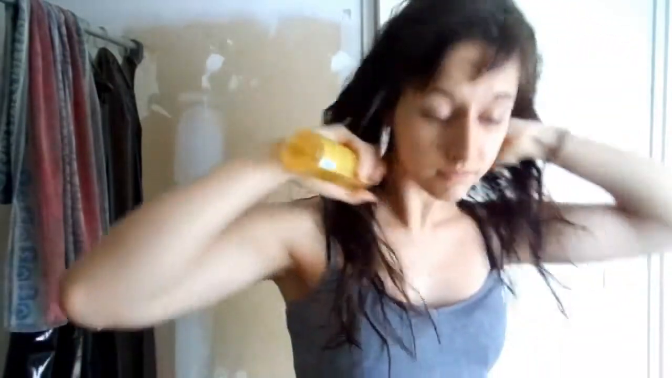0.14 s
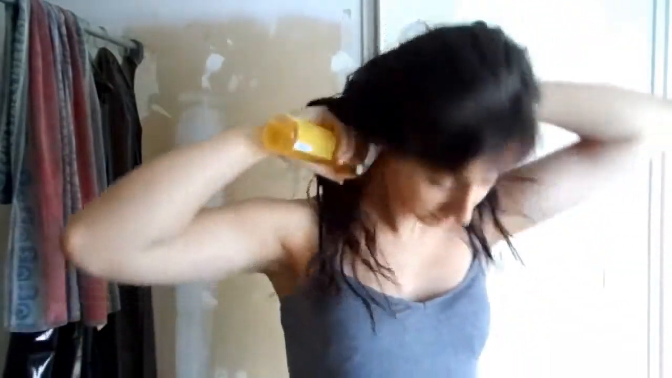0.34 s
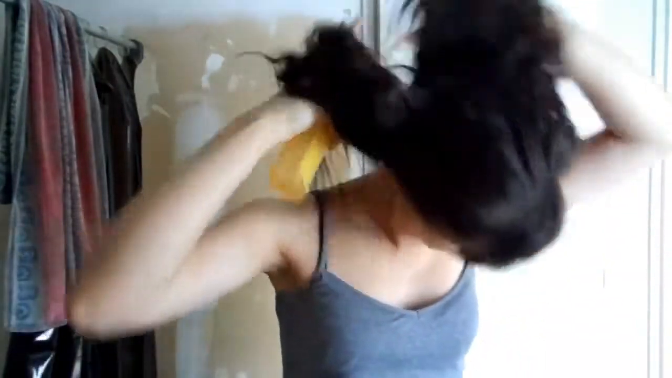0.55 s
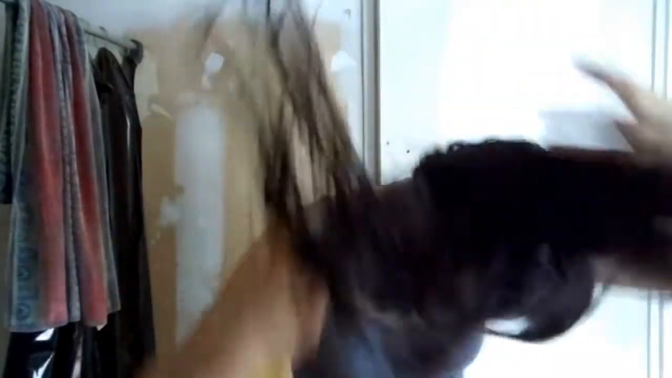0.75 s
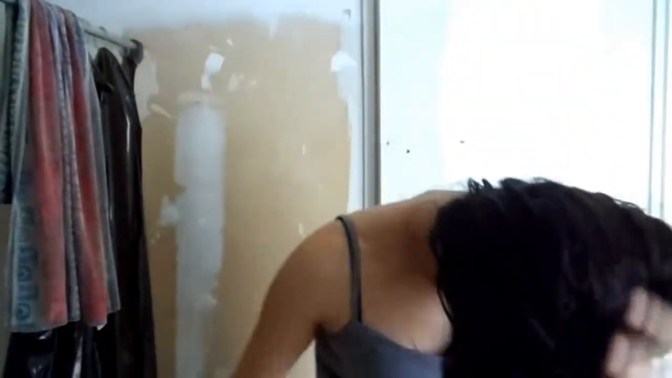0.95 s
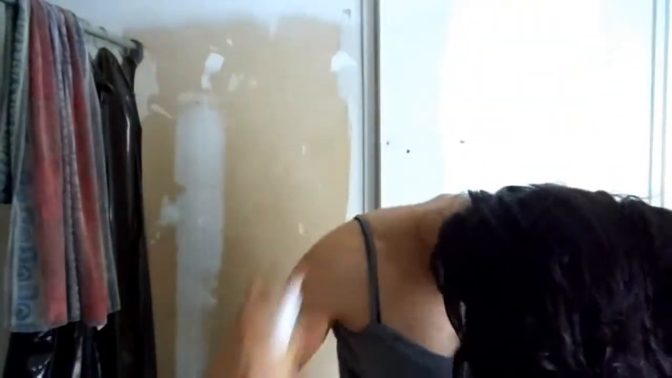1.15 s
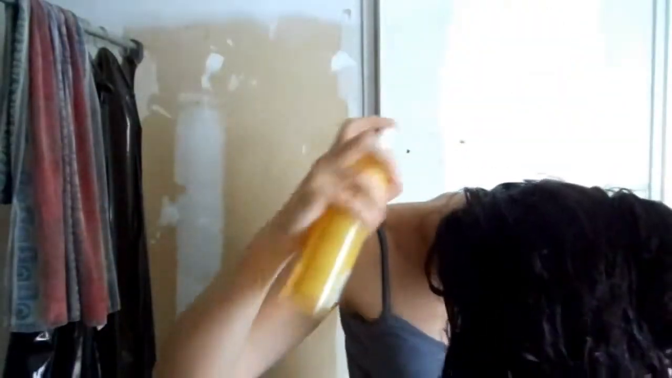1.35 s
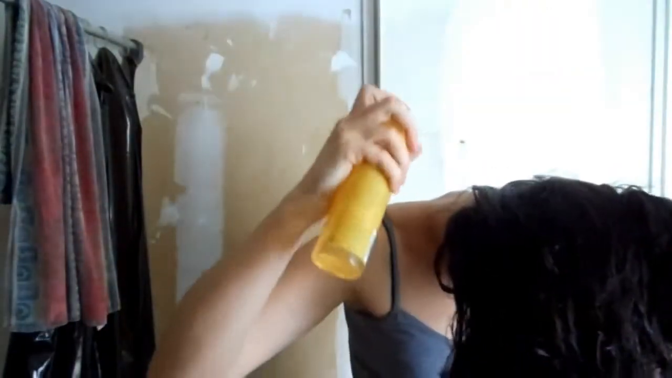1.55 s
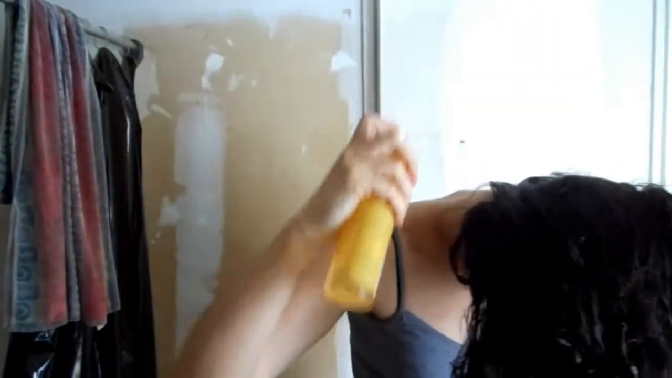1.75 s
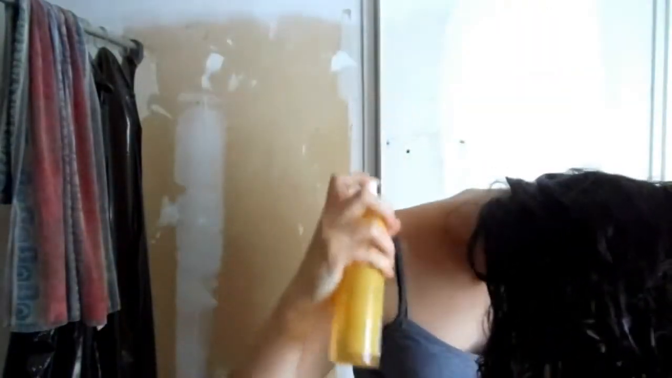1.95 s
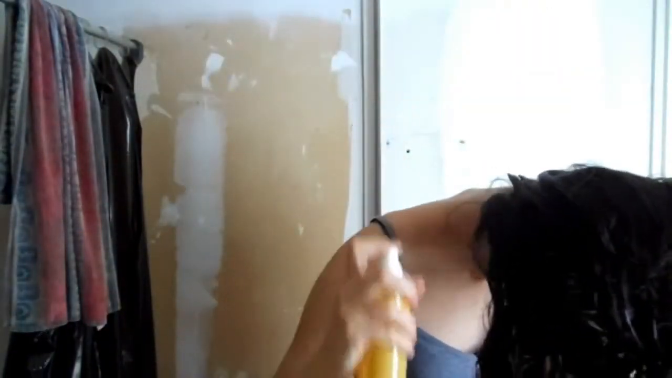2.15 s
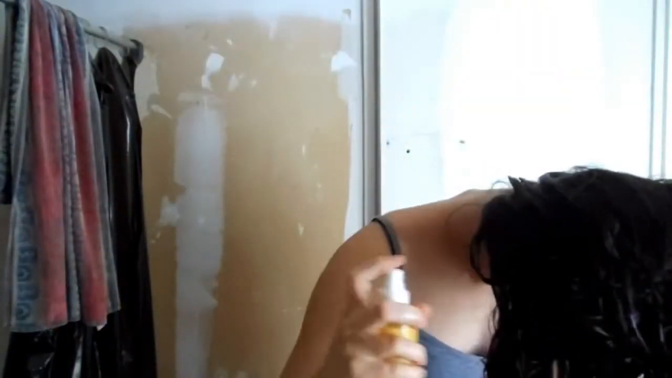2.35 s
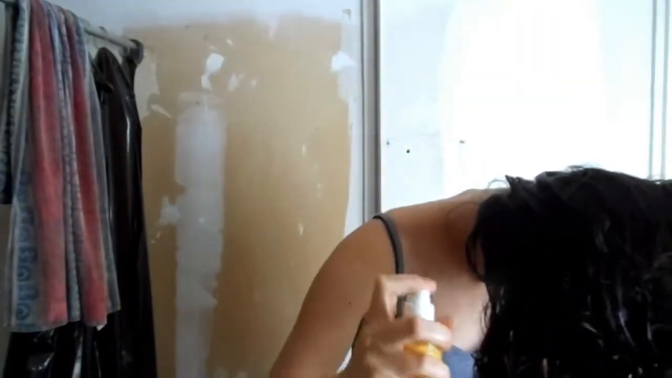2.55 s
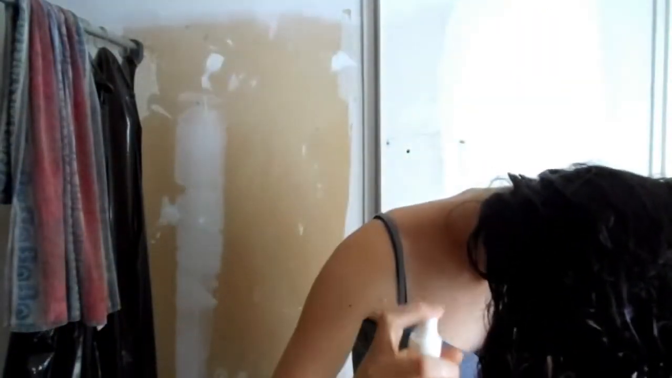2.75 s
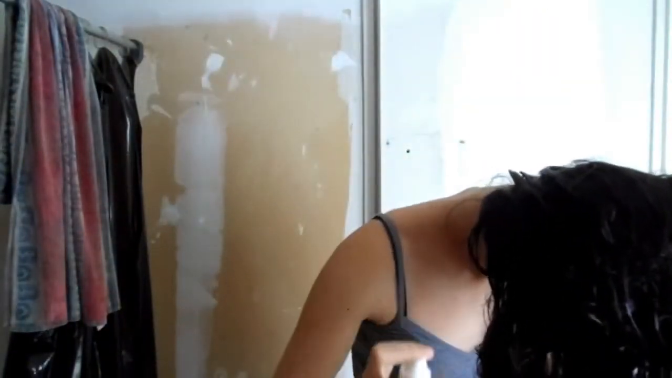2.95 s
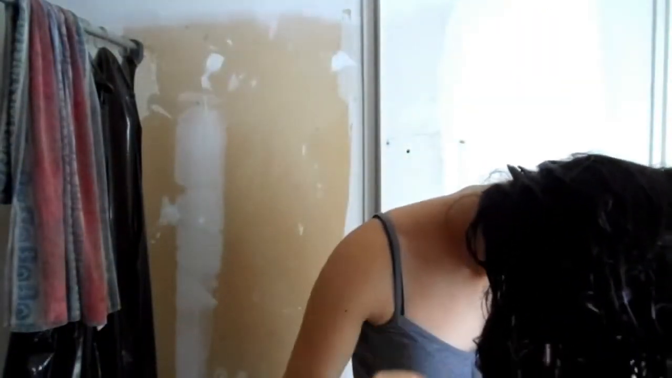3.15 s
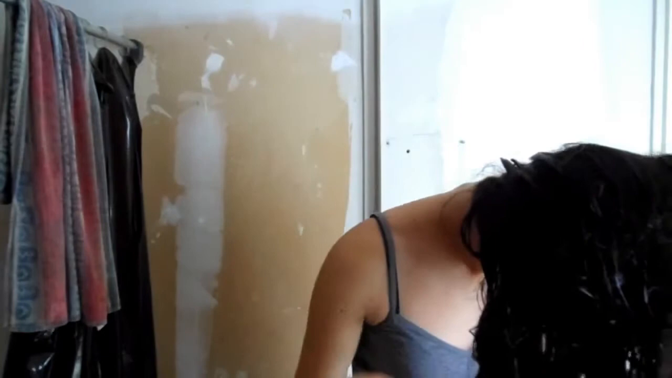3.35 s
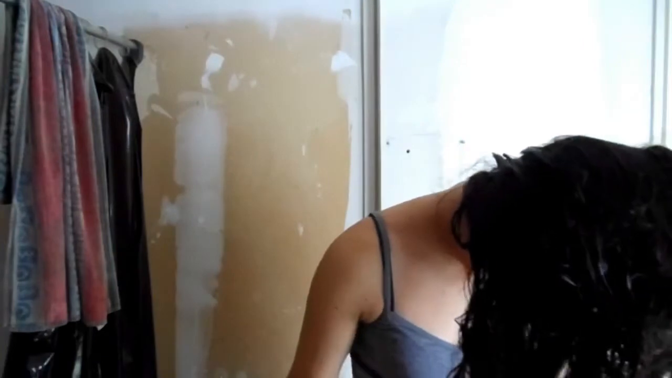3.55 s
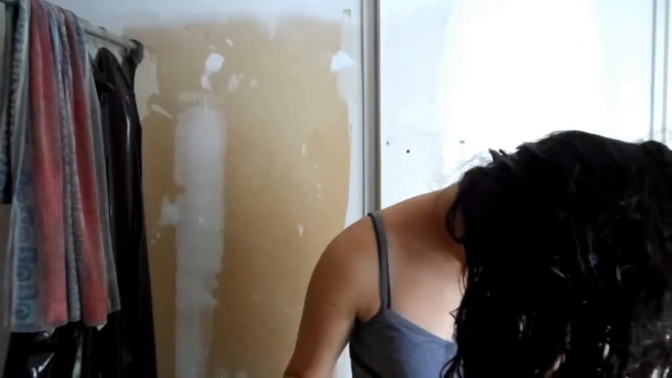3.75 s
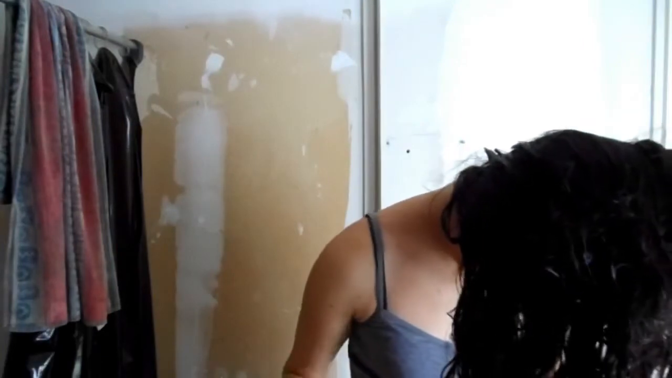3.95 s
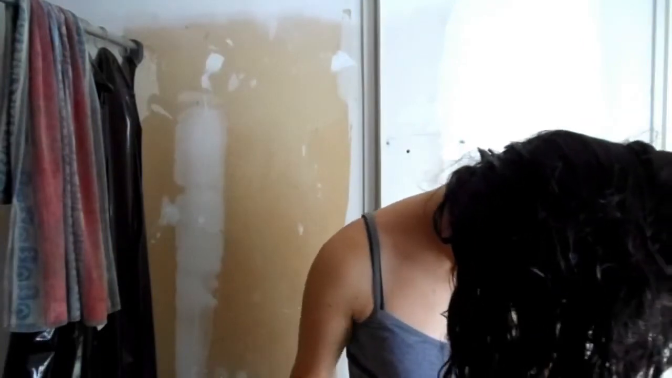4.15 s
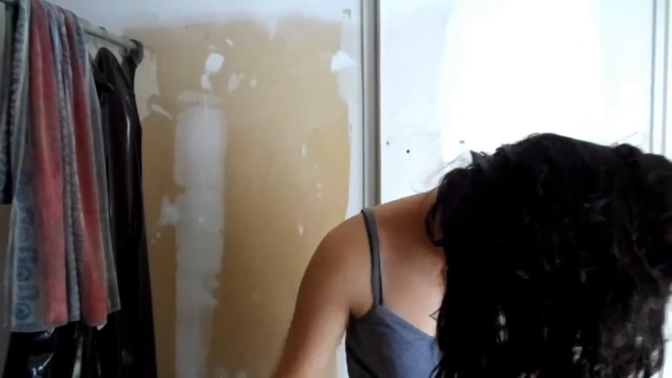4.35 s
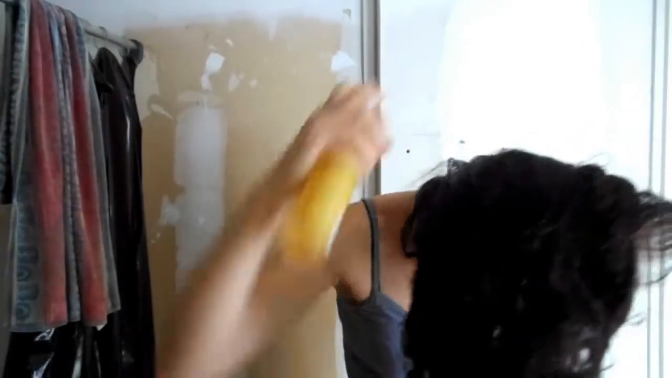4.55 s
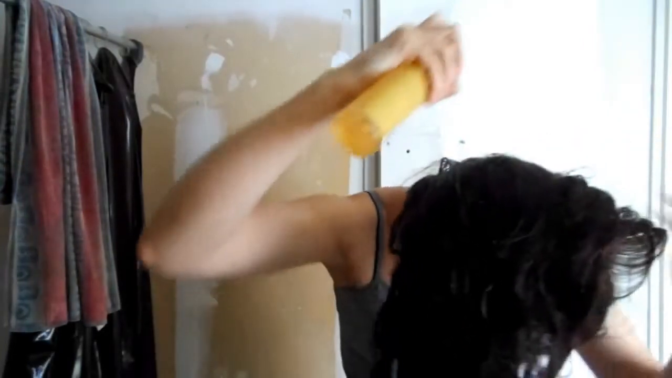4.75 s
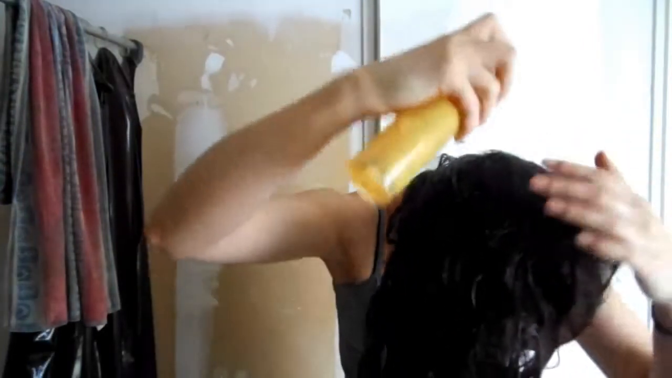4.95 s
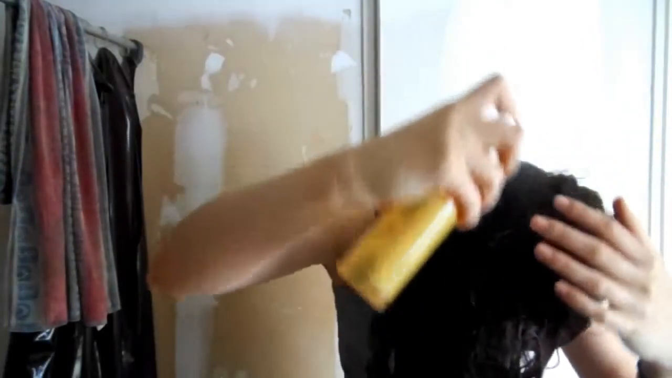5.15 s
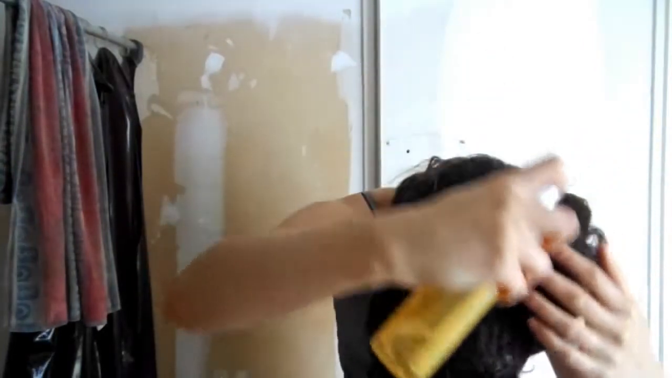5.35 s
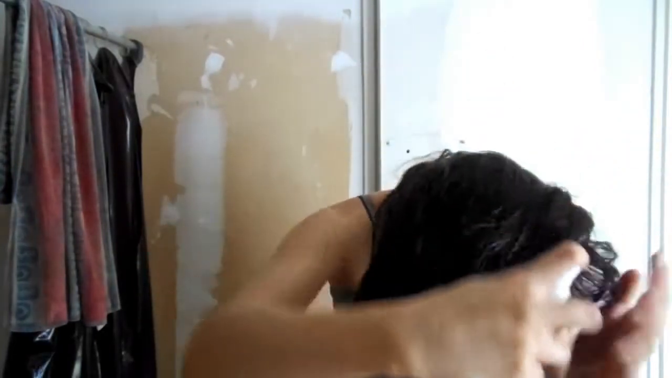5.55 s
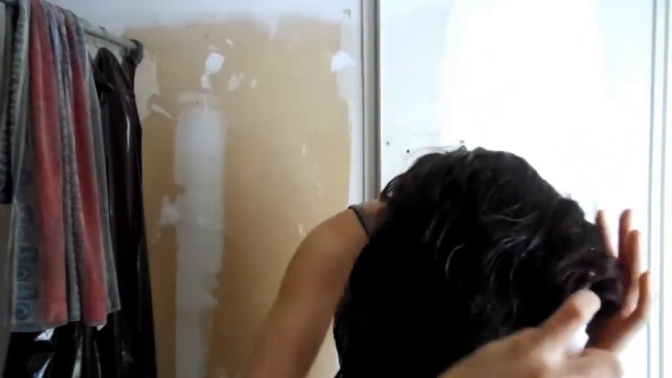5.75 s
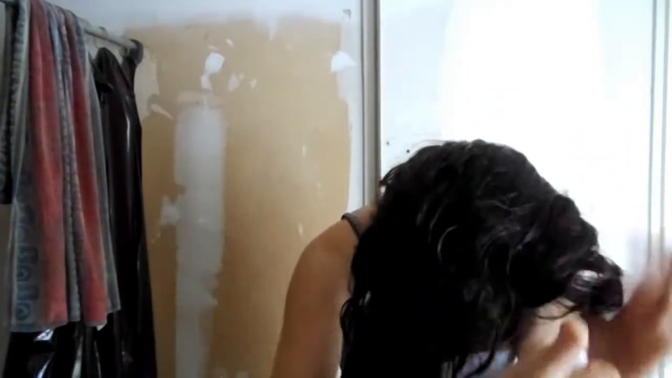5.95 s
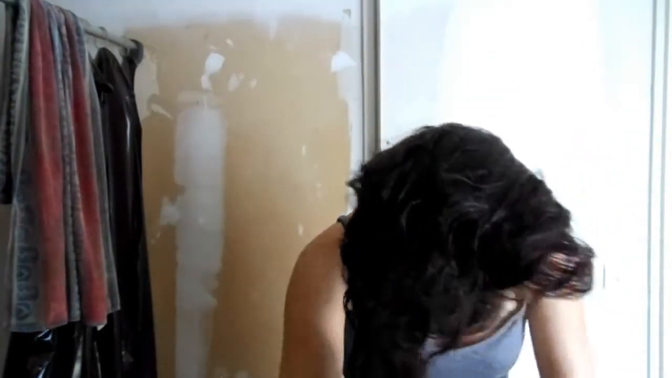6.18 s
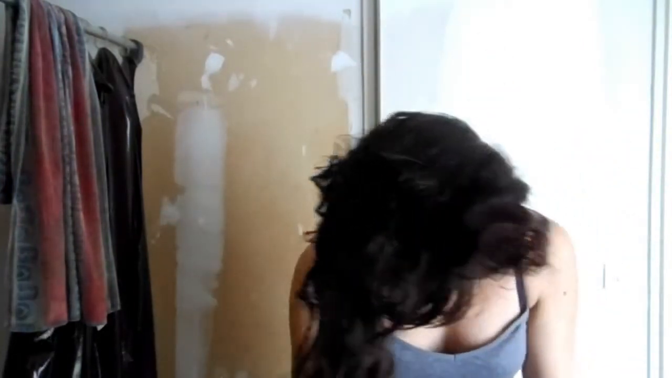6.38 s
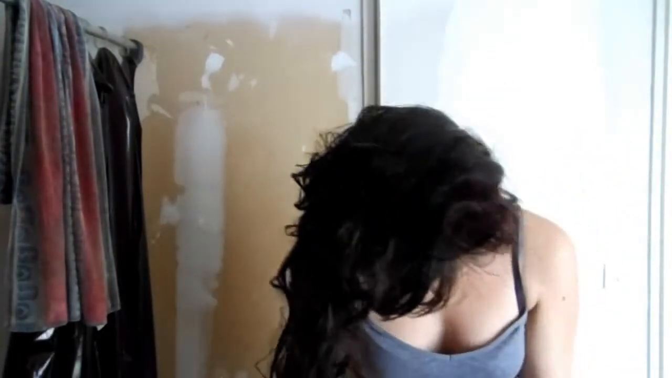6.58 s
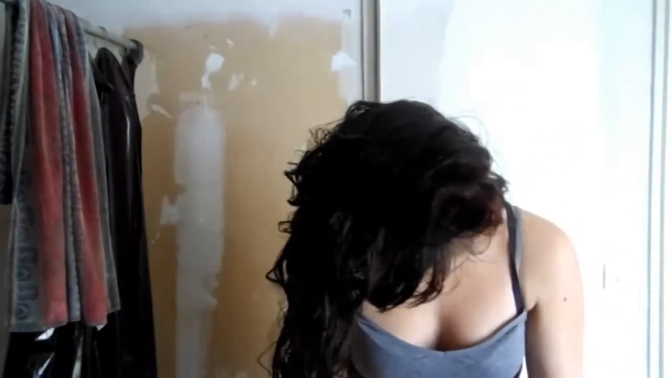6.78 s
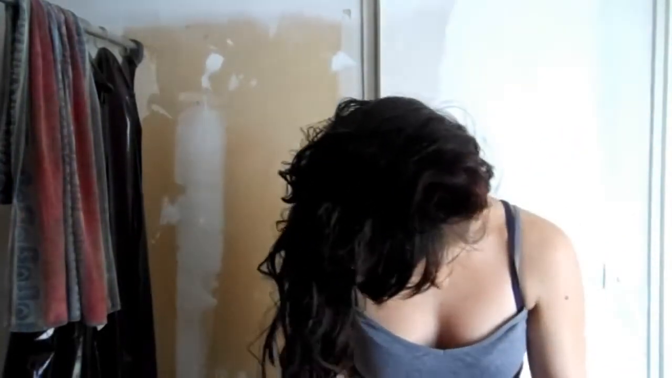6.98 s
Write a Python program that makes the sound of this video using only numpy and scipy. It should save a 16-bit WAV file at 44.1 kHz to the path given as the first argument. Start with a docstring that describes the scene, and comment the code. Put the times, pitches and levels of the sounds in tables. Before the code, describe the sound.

A plastic pump bottle sprays hair in thirteen short hissing squirts, clicking back after each press, in a small room.

```python
"""A small room: hair is misted with a plastic pump bottle, thirteen short squirts.
Each press thumps the bottle and drives a hissing jet through the nozzle. The piston knocks and ticks
as it springs back; now and then it sticks and creaks. First, flipped hair rustles, ticks and slaps;
later, fingers tap and rub the plastic. The room hums faintly."""
import sys
import numpy as np
from scipy import signal
from scipy.fft import rfft, irfft, next_fast_len
from scipy.io import wavfile

SR = 44100
rng = np.random.default_rng(int(sys.argv[2]) if len(sys.argv) > 2 else 0)


def digitize_waveform(pressure):
    """Quantize a signal to 16-bit integers and store it at the path in sys.argv[1].

    Rows of a 2-D input are taken as channels; values are limited to [-1, 1].
    """
    field = np.atleast_2d(pressure).T
    bounded = np.clip(field, -1, 1)
    quanta = np.round(bounded * 32767).astype(np.int16)
    wavfile.write(sys.argv[1], SR, quanta)


N = 309582
TIME_S = np.arange(N) / SR

# room decay: f/Hz, t60/s
ROOM_DECAY = [(200, 0.24), (1000, 0.24), (5000, 0.21), (14000, 0.17)]
# side filter of the echoes: f/Hz, gain/dB
ECHO_SIDE = [(200, -31), (900, -2), (1900, -96), (5000, -24), (7500, -1), (10000, -2.5), (14000, 2)]
# room air: f/Hz, density/dB
AIR_SPECTRUM = [(15, -2), (29, 1), (45, -6), (75, -9), (105, -5), (130, -1.5), (200, -10.5), (300, -10),
                (550, -14.5), (1000, -18), (2000, -21), (5500, -25), (14000, -28)]
# side filter of the air: f/Hz, gain/dB
AIR_SIDE = [(60, -8), (130, -7.5), (290, -3), (640, -1.5), (1400, -0.5), (3070, -3.5), (6750, 1.5),
            (14800, -0.5)]
# hum and whine: f/Hz, level/dB
HUM_TONES = [(123, -63), (7897, -74.5)]
# low drone: t/s, level/dB
DRONE_LEVELS = [(0, -73), (5.3, -68), (5.9, -61.5), (6.35, -58), (7.02, -68)]
# brushed hair: f/Hz, density/dB
HAIR_SPECTRUM = [(300, 6.5), (1300, -20), (2600, 8), (4500, 2), (9000, 2.5), (14000, 2)]
# hair and hands brushing: t/s, half length/s, level/dB
HAIR_TOUCHES = [(.328, .016, -56), (.51, .014, -54), (.958, 0.027, -54.5), (1.043, 0.027, -50),
                (1.173, .02, -59), (5.818, .02, -57), (6.359, .023, -46)]
# pitched ticks of flipped hair, later fingers rubbing the bottle: t/s, half length/s, level/dB, f/Hz
PITCHED_TOUCHES = [(.871, .004, -58, 5400), (.904, .004, -55, 2900), (0.942, 0.003, -52, 5100),
                   (5.806, 0.017, -56, 2460), (6.367, 0.015, -49, 2490), (6.967, 0.0082, -50, 2520)]
# sharp ticks, a flick of hair and taps on the plastic: t/s, level/dB, treble/dB
SHARP_TICKS = [(.4435, -57, 9), (1.034, -42, 6), (2.238, -36, -4), (3.64, -37, -4), (3.985, -41, 2),
               (5.4703, -38.5, -3), (5.8002, -32, 1.5), (6.052, -33, 8.5), (6.346, -34, 10.5),
               (6.3648, -34, 0.5), (6.6815, -32.5, 4)]
# sharp contact: f/Hz, density/dB
SNAP_SPECTRUM = [(400, -13), (1200, -12), (2500, 0), (5000, 2), (8000, 2), (14000, 2.5)]
# piston stick-slip: t/s, length/s, slip rate/Hz, rasp/dB, squeak/dB, thump/dB
PISTON_CREAKS = [(1.908, .016, 305, -31, -25.5, -33), (4.318, .016, 336, -29, -35.5, -40),
                 (4.811, .022, 200, -31, -39, -32.5), (5.071, .007, 310, -38.5, -35, -53)]
# piston modes: f/Hz, level/dB, t60/s
PISTON_MODES = [(432, -3.5, 0.049), (1133, -7.5, 0.029), (1790, -5, 0.027), (2076, -2.5, 0.012),
                (2880, -6, 0.0087)]
# piston springing back: t/s, travel/s, wait for click/s, release/dB, stop/dB, valve/dB, click/dB
PISTON_RETURNS = [(1.794, 0.054, 0.0075, -38.5, -39.5, -40, -37),
                  (2.1157, 0.057, 0.0054, -40, -37.5, -39.5, -32.5),
                  (2.46, .057, 0.0044, -40.5, -36, -39.5, -30.5),
                  (2.807, 0.056, 0.0042, -41, -39.5, -40, -30.5),
                  (3.16, .057, 0.007, -43.5, -38, -41, -32.5),
                  (3.514, 0.059, .006, -37.5, -39.5, -42, -32.5),
                  (3.846, 0.059, 0.0048, -39.5, -39, -45, -34.5),
                  (4.209, 0.064, 0.0057, -41, -40.5, -41, -40), (4.546, .068, .006, -40.5, -45, -42, -61),
                  (5.023, .06, 0.053, -39, -31, -41.5, -35), (5.355, 0.063, 0.03, -43, -35.5, -38, -35),
                  (5.688, 0.067, .025, -46, -39.5, -42.5, -30),
                  (6.261, 0.064, 0.02, -54, -37.5, -40.5, -36.5)]
# bottle wall modes: multiple of wall pitch, level/dB, t60/s
WALL_MODES = [(.7, -5.5, 0.025), (1, 2, 0.028), (1.35, -7.5, 0.021), (2.4, -20.5, 0.069)]
# hold on the bottle (tipped, it thumps instead of knocking): t/s, wall f/Hz, thump share, cavity/dB
BOTTLE_GRIP = [(1.9, 432, 0.63, -16.5), (2.5, 426, 0.17, -15), (3.5, 438, 0.15, -16), (4.3, 463, 0.16, -8),
               (4.8, 444, 0.3, -12), (5.08, 491, 0.96, -9.5), (5.45, 460, 0.96, -16), (6.3, 460, 0.18, -30)]
# dull bumps, a slap of hair, then knocks of the bottle: t/s, level/dB
DULL_BUMPS = [(1.035, -40.5), (1.936, -39), (2.238, -40.5), (5.135, -41), (5.202, -38), (5.301, -41),
              (5.596, -40), (6.051, -36)]
# presses: t/s, stroke/s, level/dB, onset/dB, treble/dB, thump/dB
PRESSES = [(1.623, .17, -31.5, -5, -1, -38.5), (1.926, .17, -32, -14, -2, -37),
           (2.265, .16, -30, -11, -1.5, -38.5), (2.626, .16, -30.5, -3.5, -1.5, -39.5),
           (2.972, .16, -29.5, -7.5, -1, -38), (3.317, .16, -29.5, -4.5, -0.5, -39.5),
           (3.668, 0.17, -31.5, -2, -0.6, -38.5), (4.024, .17, -33.5, -6.5, -1.5, -39.5),
           (4.336, .18, -33, -23, 0, -36), (4.851, .16, -33, -2.5, -3, -36),
           (5.169, .17, -33, -5.5, -4, -37), (5.517, 0.14, -34.5, -5, 1.5, -44),
           (6.049, .14, -36, -9, .5, -38)]
# flow through a press: share of stroke, flow/dB
STROKE_FLOW = [(0, -4), (.2, -1.5), (.45, 0.54), (.7, -.5), (.87, -3.5), (1, -13), (1.15, -53), (1.4, -69)]
# jet hiss: f/Hz, density/dB
JET_SPECTRUM = [(300, -51), (900, -23), (1450, -22), (1900, -12.5), (2600, -9.5), (3500, -6), (5000, -5),
                (6200, -5.5), (8000, -4), (9500, -2), (11000, -0.5), (13000, 4), (14400, -3)]


def from_db(db):
    """Decibels to gain."""
    return 10 ** (np.asarray(db) / 20)


def unit_rms(x):
    """Scale to unit power."""
    return x / np.sqrt(np.mean(x ** 2) + 1e-20)


def at_hz(curve, hz):
    """Read a curve on a log-frequency axis."""
    knots_hz, values = np.transpose(curve)
    return np.interp(np.log(hz + 1e-9), np.log(knots_hz), values)


def colour(x, curve):
    """Filter by a curve of f/Hz, gain/dB."""
    size = next_fast_len(len(x))
    gain = from_db(at_hz(curve, np.fft.rfftfreq(size, 1 / SR)))
    return irfft(rfft(x, size) * gain, size)[:len(x)]


def noise(spectrum, size=N):
    """Coloured noise of unit power."""
    return unit_rms(colour(rng.standard_normal(size), spectrum))


def drift(rate_hz, size=N):
    """Ramps between random knots of spread 1."""
    knots = rng.standard_normal(size // 8)
    return np.interp(np.arange(size) * rate_hz / SR, np.arange(len(knots)), knots)


def resonance(x, hz, width_hz):
    """Two-pole band-pass, peak gain 1."""
    r = np.exp(-np.pi * width_hz / SR)
    feedback = [1, -2 * r * np.cos(2 * np.pi * hz / SR), r * r]
    return signal.lfilter(np.array([1, 0, -1]) * (1 - r * r) / 2, feedback, x)


def decay(t, t60_s):
    """Envelope falling 60 dB in t60_s."""
    return np.exp(-np.log(1000) * t / t60_s)


def swell(at_s, half_s, db):
    """Gaussian rise and fall of one touch."""
    return from_db(db) * np.exp(-((TIME_S - at_s) / half_s) ** 2)


def struck(modes, spread_db, detune=0.022):
    """One blow: damped modes, each scattered in level and pitch."""
    out, t = 0, TIME_S[:SR // 8]
    for k, (hz, db, t60_s) in enumerate(modes):
        gain = (-1) ** k * from_db(db + spread_db * rng.normal())
        mode_hz = hz * (1 + detune * rng.normal())
        out = out + gain * decay(t, t60_s) * np.sin(2 * np.pi * mode_hz * t)
    return out


def add(track, at_s, sound):
    """Mix a sound in at a time."""
    start = max(int(at_s * SR), 0)
    track[start:start + len(sound)] += sound[:N - start]


def room_tail(build_s=0.00033):
    """Dense wall echoes of unit energy; the treble dies first."""
    out, t = 0, TIME_S[:SR // 3]
    edges_hz = np.geomspace(100, 16000, 9)
    for low, high in zip(edges_hz, edges_hz[1:]):
        bandpass = signal.butter(2, [low, high], "band", fs=SR, output="sos")
        band = signal.sosfilt(bandpass, rng.standard_normal(len(t)))
        out = out + band * decay(t, at_hz(ROOM_DECAY, np.sqrt(low * high)))
    out = out * (1 - np.exp(-t / build_s))
    return out / np.sqrt(np.sum(out ** 2))


def echoes(x, patterns, cycle_hz=4.1):
    """Echo patterns cross-fade as the hand moves through the room."""
    fades = np.array([np.cos(np.pi * (cycle_hz * TIME_S + k / patterns)) ** 8 + 1e-6
                      for k in range(patterns)])
    tails = np.array([signal.oaconvolve(x, room_tail())[:N] for _ in fades])
    return np.sum(fades * tails, axis=0) / np.sqrt(np.sum(fades ** 2, axis=0))


def room(x, wet_db, side_db, patterns=1):
    """Mid and side of a source with its echoes."""
    mid = x + from_db(wet_db) * echoes(x, patterns)
    return np.array([mid, from_db(side_db) * echoes(x, patterns)])


def microphone(mid, side, left_db=-1.5, ports_db=-13):
    """Two close ports, source slightly right; short waves arrive out of step and unequally loud."""
    skew = colour(np.roll(mid, -3) - np.roll(mid, 3), [(5500, -30), (7500, -4), (11000, 0)])
    imbalance = colour(mid, [(500, 2), (2000, -34), (4000, -45), (8000, 9)])
    side = colour(side, ECHO_SIDE) + from_db(ports_db) * skew + (from_db(left_db) - 1) / 2 * imbalance
    return np.array([mid + side, mid - side])


def hum(waver_db=4.5):
    """A low hum and a thin whine, both wavering."""
    out = 0
    for hz, db in HUM_TONES:
        waver = from_db(waver_db * drift(8))
        phase_rad = 2 * np.pi * hz * TIME_S + 0.71 * drift(9.1)
        out = out + from_db(db) * unit_rms(waver * np.sin(phase_rad))
    return out


def room_air(air_db=-52.5, balance_db=-0.7):
    """Wide rumble and hiss around the hum."""
    mid, side = noise(AIR_SPECTRUM), colour(noise(AIR_SPECTRUM), AIR_SIDE)
    stereo = from_db(air_db) * np.array([mid + side, mid - side]) + hum()
    return stereo * from_db([[balance_db / 2], [-balance_db / 2]])


def drone(hz=161.3, width_hz=15.8):
    """A narrow low murmur of the room, swelling near the end."""
    band = resonance(rng.standard_normal(N), hz, width_hz)
    level_db = np.interp(TIME_S, *np.transpose(DRONE_LEVELS))
    return from_db(level_db) * unit_rms(resonance(band, hz, width_hz))


def hair(grain_db=5):
    """Strands brush past each other in short grainy swishes."""
    grains = noise(HAIR_SPECTRUM) * from_db(grain_db * drift(600))
    return sum(swell(*touch) for touch in HAIR_TOUCHES) * unit_rms(grains)


def pitched_touches(width_hz=450):
    """Brief narrow noise bursts: flipped hair ticks, later fingers rub the bottle."""
    return sum(swell(at_s, half_s, db) * unit_rms(resonance(rng.standard_normal(N), hz, width_hz))
               for at_s, half_s, db, hz in PITCHED_TOUCHES)


def snap(ring_db, crack_t60_s=0.0021, ring_t60_s=0.046):
    """Sharp contact: crack, rebound, short dense ring."""
    t = TIME_S[:SR // 30]
    crack = 1.3 * decay(t, crack_t60_s)
    rebound = 0.8 * np.roll(crack, int(rng.uniform(0.0008, 0.002) * SR))
    ring = from_db(ring_db) * decay(t, ring_t60_s)
    return noise(SNAP_SPECTRUM, len(t)) * (crack + rebound + ring)


def creaks(squeak_hz=5150, squeak_t60_s=0.007):
    """A dry piston moves in quick slips, each a rasp that rings the stem."""
    out, t = np.zeros(N), TIME_S[:SR // 30]
    for at_s, length_s, rate_hz, rasp_db, squeak_db, _ in PISTON_CREAKS:
        for k in range(8):
            delay_s = max(k + 0.12 * rng.normal(), 0) / rate_hz
            hz = squeak_hz * (1 + 0.046 * rng.normal())
            squeak = np.sin(2 * np.pi * hz * t) * decay(t, squeak_t60_s)
            slip = from_db(rasp_db) * snap(ring_db=-15) + from_db(squeak_db) * squeak
            if delay_s < length_s:
                add(out, at_s + delay_s, slip)
    return out


def ticks(gain_db=3, damped_ring_db=-18, free_ring_db=-11, valve_treble_db=2, click_treble_db=1):
    """Hair flick and taps are damped; on each return the inlet valve ticks, the head clicks home."""
    contacts = [(*tick, damped_ring_db) for tick in SHARP_TICKS]
    for at_s, travel_s, wait_s, _, _, valve_db, click_db in PISTON_RETURNS:
        contacts.append((at_s + 0.47 * travel_s, valve_db, valve_treble_db, free_ring_db))
        contacts.append((at_s + travel_s + wait_s, click_db, click_treble_db, free_ring_db))
    out = np.zeros(N)
    for at_s, db, treble_db, ring_db in contacts:
        tick = colour(snap(ring_db), [(3000, -treble_db), (10000, treble_db)])
        add(out, at_s, from_db(db + gain_db) * tick)
    return out


def grip(at_s):
    """Wall f/Hz, thump share and cavity/dB at one moment."""
    times_s, *columns = np.transpose(BOTTLE_GRIP)
    return [np.interp(at_s, times_s, column) for column in columns]


def blows(press_knock_db=-6, creak_lag_s=0.00428):
    """Every dull contact: t/s, knock gain, thump gain."""
    knocks = list(DULL_BUMPS)
    for at_s, travel_s, _, release_db, stop_db, *_ in PISTON_RETURNS:
        knocks += [(at_s, release_db), (at_s + travel_s, stop_db)]
    for at_s, db in knocks:
        _, thump_share, _ = grip(at_s)
        yield at_s, from_db(db) * np.sqrt(1 - thump_share), from_db(db) * np.sqrt(thump_share)
    for at_s, *_, db in PRESSES:
        yield at_s, from_db(db + press_knock_db), from_db(db)
    for at_s, *_, db in PISTON_CREAKS:
        yield at_s + creak_lag_s, 0, from_db(db)


def piston_knocks(gain_db=0.5):
    """Presses, releases and stops ring the piston; the dull bumps share its modes."""
    out = np.zeros(N)
    for at_s, gain, _ in blows():
        add(out, at_s, gain * struck(PISTON_MODES, spread_db=2))
    return from_db(gain_db) * out


def bottle_thumps(gain_db=3, cavity_hz=464.5, cavity_t60_s=0.16):
    """The wall thuds at a pitch set by the grip; the air inside rings on."""
    out = np.zeros(N)
    for at_s, _, gain in blows():
        wall_hz, _, cavity_db = grip(at_s)
        modes = [(ratio * wall_hz, db, t60_s) for ratio, db, t60_s in WALL_MODES]
        modes.append((cavity_hz, cavity_db, cavity_t60_s))
        add(out, at_s, gain * struck(modes, spread_db=1.85))
    return from_db(gain_db) * out


def jet(t, progress, effort_db, treble_db, nozzle_db=2.5, pipe_hz=1780, hand_s=0.00089):
    """The jet breaks into hissing droplets; a firmer press whistles more at the nozzle."""
    hiss = noise(JET_SPECTRUM, len(t))
    whistle = (from_db(nozzle_db + effort_db) - 1) * resonance(hiss, hz=7300, width_hz=550)
    hiss = colour(hiss + whistle, [(1800, -0.5 * treble_db), (4500, 0), (11000, treble_db)])
    # short echo: evenly spaced, pipe-like peaks
    pipe_lag_s = (1 + 0.022 * rng.normal()) / pipe_hz
    hiss = hiss + 0.11 * np.interp(t - pipe_lag_s, t, hiss)
    # bounce off the moving hand: a new comb on every press
    hand_lag_s = hand_s * np.exp(0.388 * rng.normal()) * (1 + 0.16 * rng.normal() * progress)
    return unit_rms(hiss + 0.27 * np.interp(t - hand_lag_s, t, hiss))


def mist(gain_db=-1.5, average_press_db=-32, attack_s=0.0019, opening_s=0.013):
    """Pressure swells and sinks with each stroke; the hiss follows, sputtering slightly."""
    out, t = np.zeros(N), TIME_S[:SR // 3]
    shares, flow_db = np.transpose(STROKE_FLOW)
    for at_s, stroke_s, level_db, onset_db, treble_db, _ in PRESSES:
        progress, effort_db = t / stroke_s, level_db - average_press_db
        hiss = jet(t, progress, effort_db, treble_db)
        # a sharp press opens the valve near full pressure; a firm one peaks late
        opening_db = (onset_db - flow_db[0]) * np.exp(-t / opening_s)
        push_db = (0.35 - 0.15 * effort_db) * np.sin(2 * np.pi * np.minimum(progress, 1))
        sputter_db = -0.5 * drift(480, len(t))
        shape_db = np.interp(progress, shares, flow_db) + opening_db + push_db + sputter_db
        add(out, at_s, hiss * from_db(level_db + shape_db) * np.minimum(t / attack_s, 1))
    return from_db(gain_db) * out


def scene():
    """Bottle and hair in the room, in stereo."""
    hiss = room(mist() + hair() + pitched_touches(), wet_db=-5, side_db=-3, patterns=5)
    clicks = room(ticks() + piston_knocks() + creaks(), wet_db=-3, side_db=-2.5, patterns=3)
    thumps = room(bottle_thumps(), wet_db=-6.5, side_db=-12)
    return microphone(*(hiss + clicks + thumps)) + room_air() + drone()


def record(dry):
    """Steep low-pass at 14.4 kHz."""
    return signal.sosfilt(signal.ellip(12, 0.2, 70, 14400, fs=SR, output="sos"), dry)


dry = scene()
out = record(dry)
digitize_waveform(out)
```